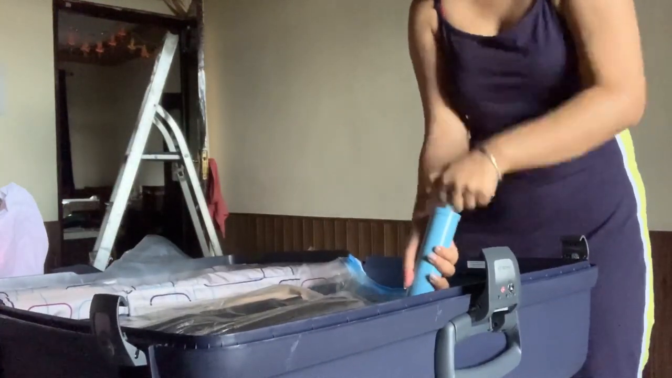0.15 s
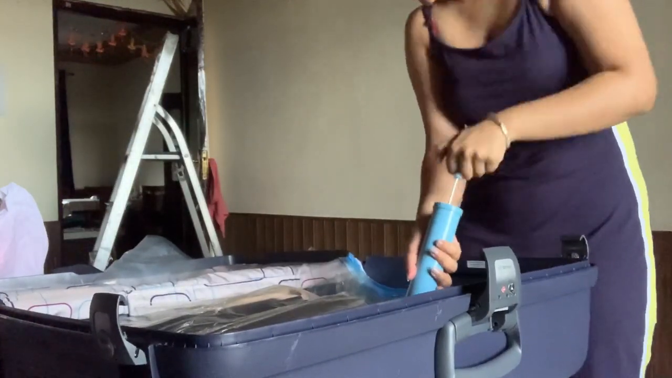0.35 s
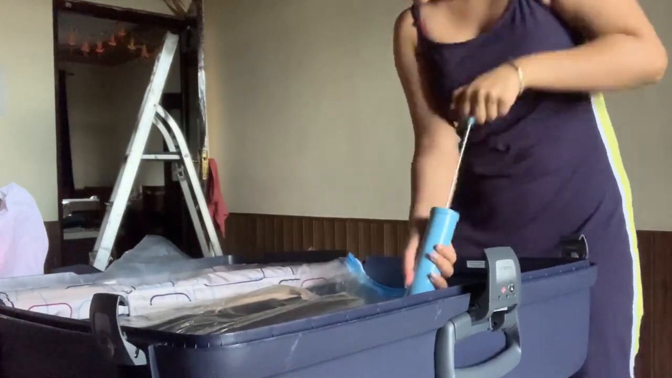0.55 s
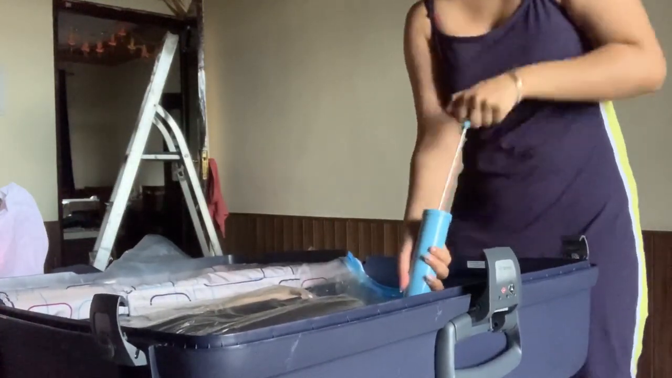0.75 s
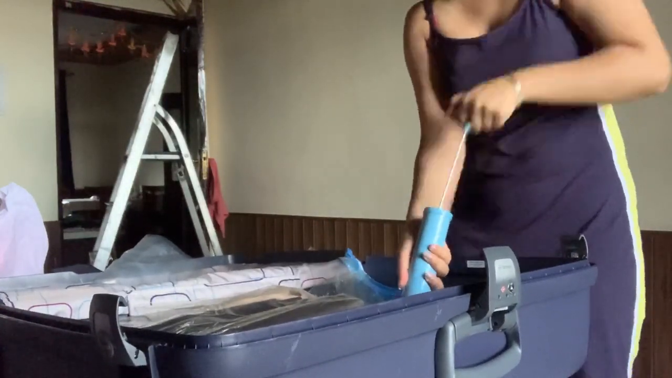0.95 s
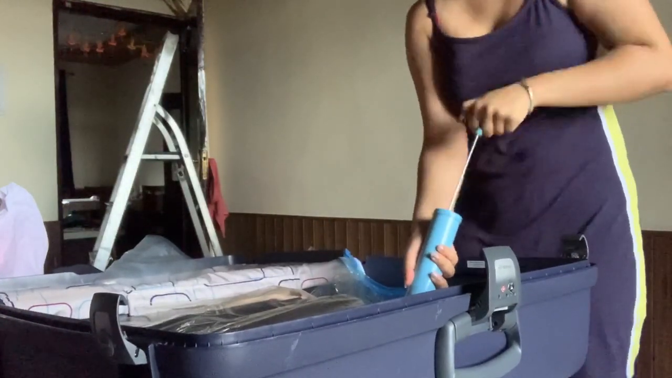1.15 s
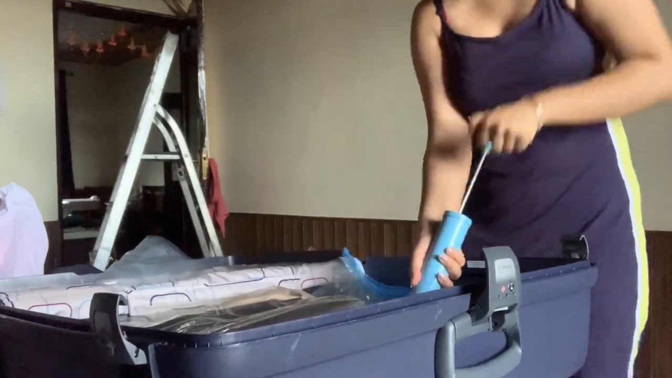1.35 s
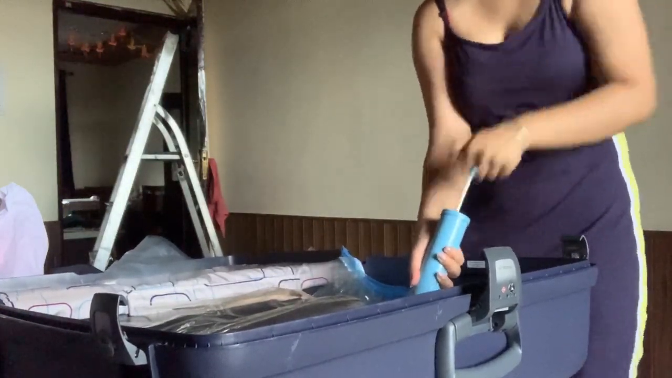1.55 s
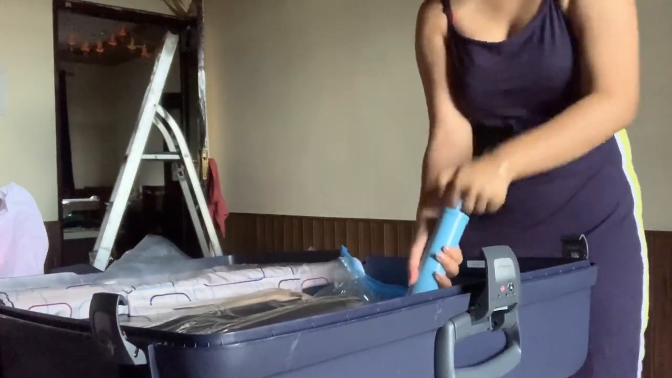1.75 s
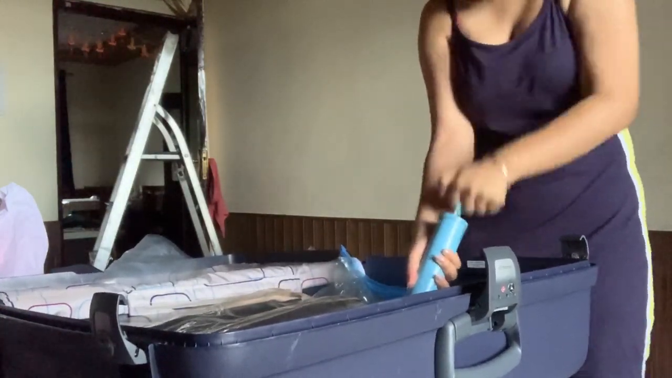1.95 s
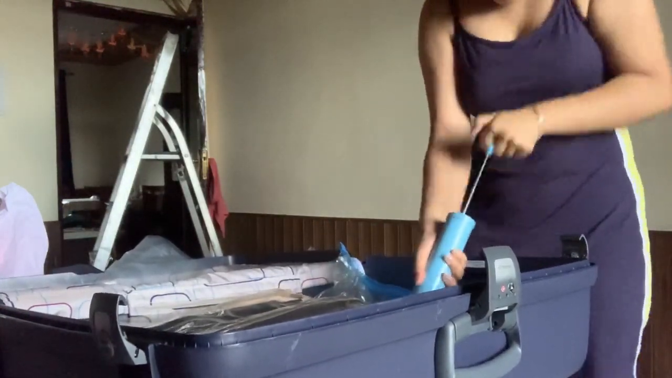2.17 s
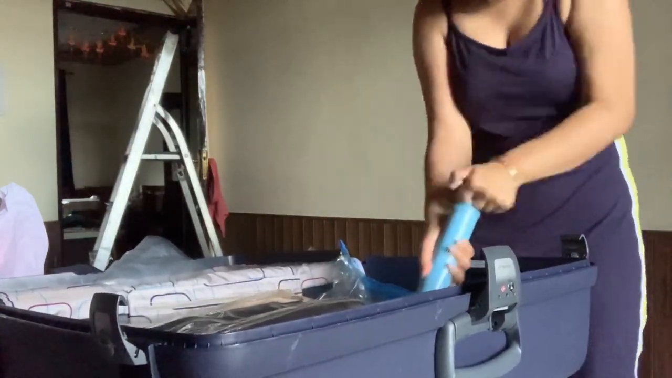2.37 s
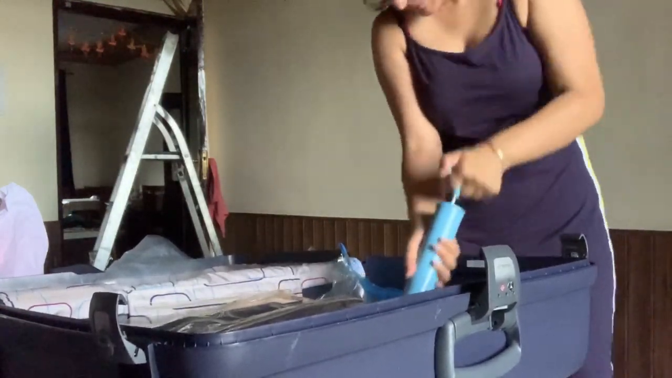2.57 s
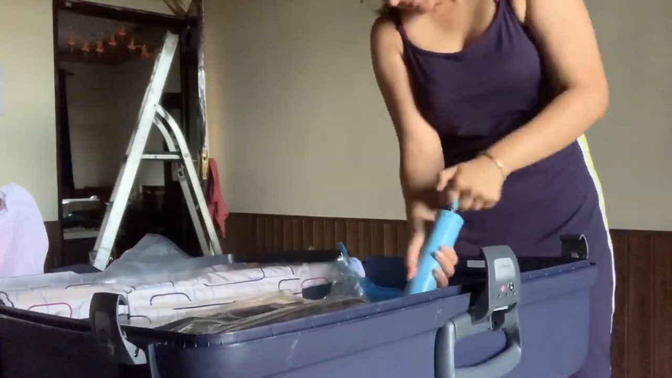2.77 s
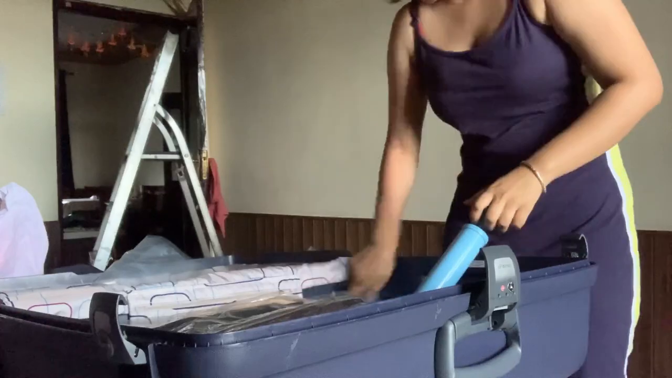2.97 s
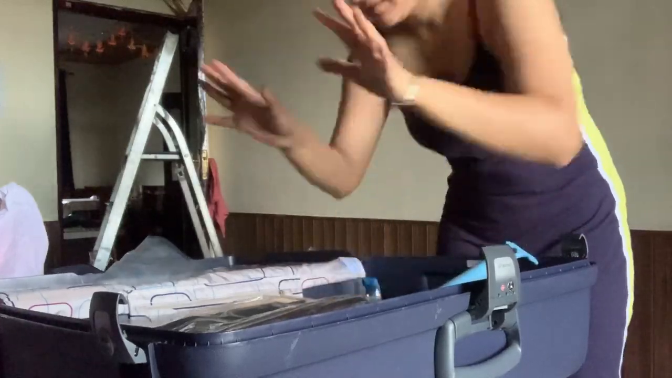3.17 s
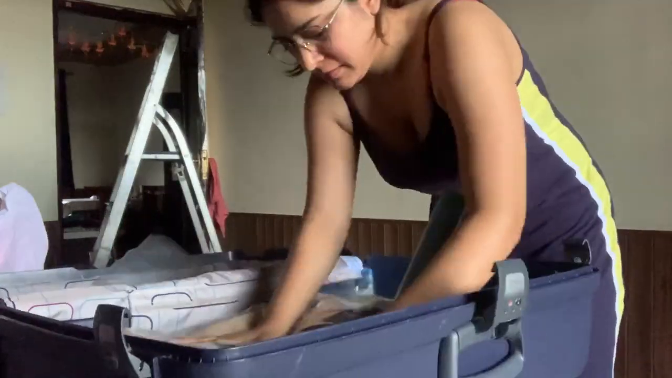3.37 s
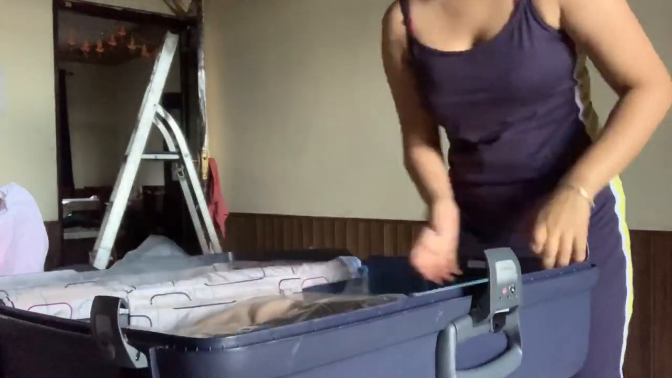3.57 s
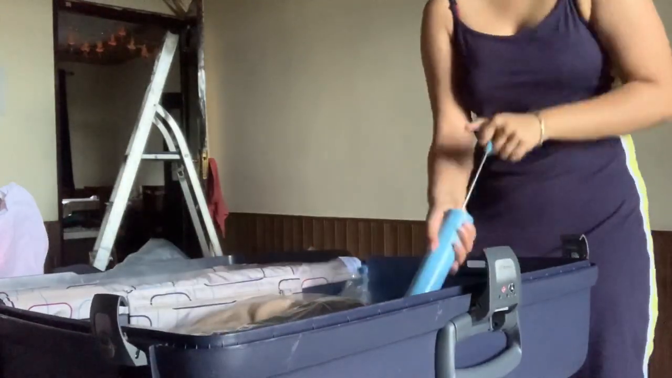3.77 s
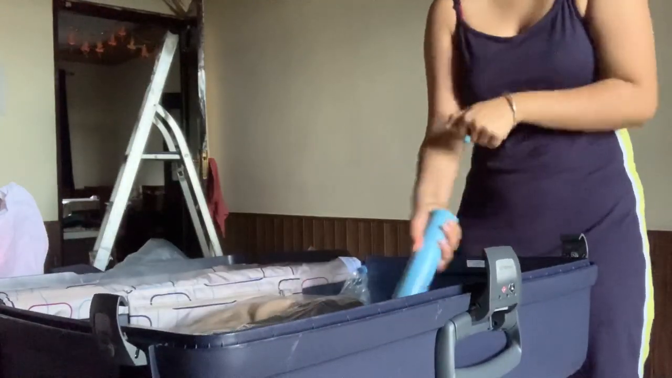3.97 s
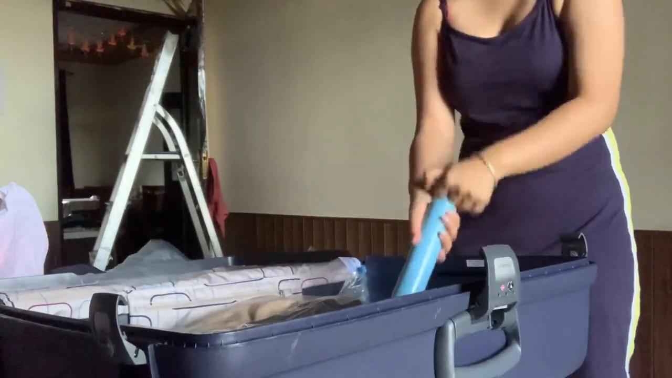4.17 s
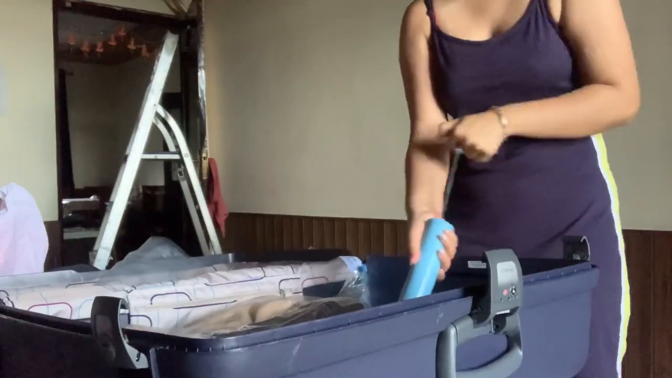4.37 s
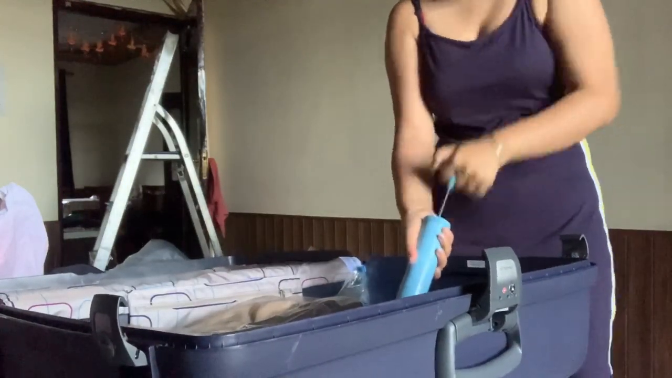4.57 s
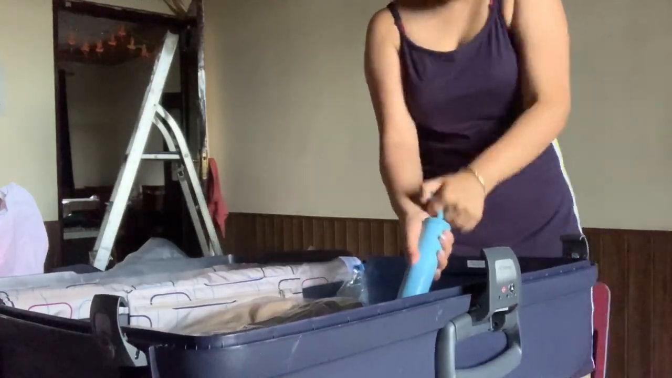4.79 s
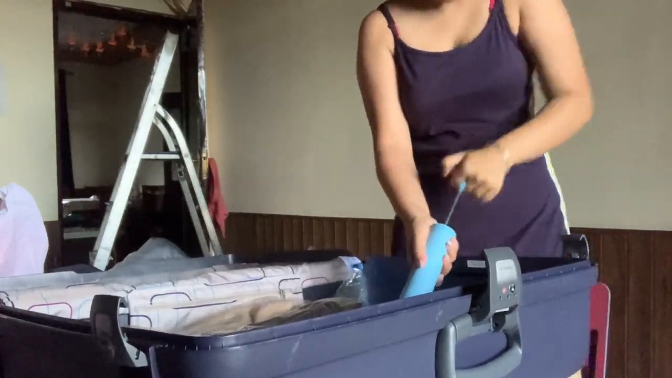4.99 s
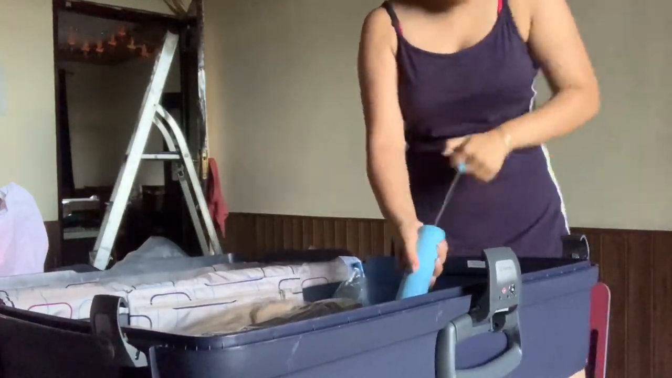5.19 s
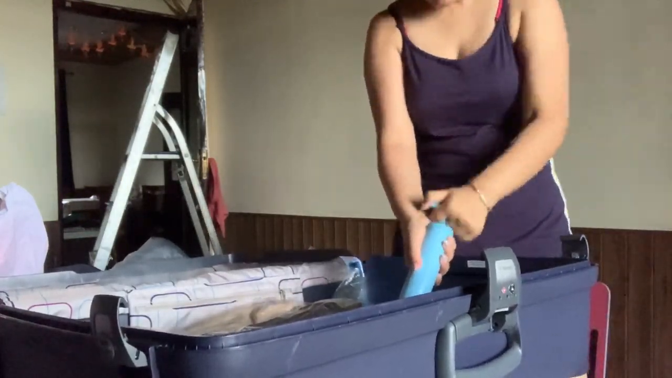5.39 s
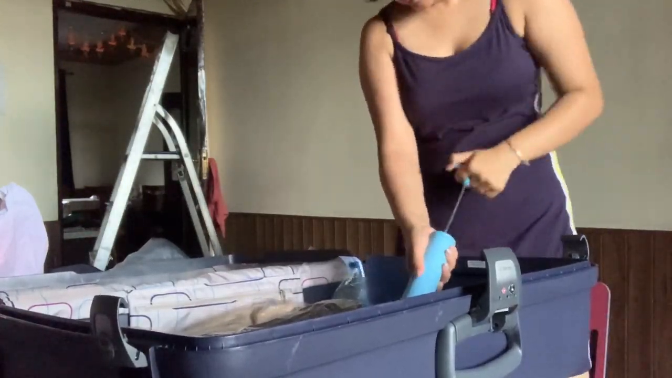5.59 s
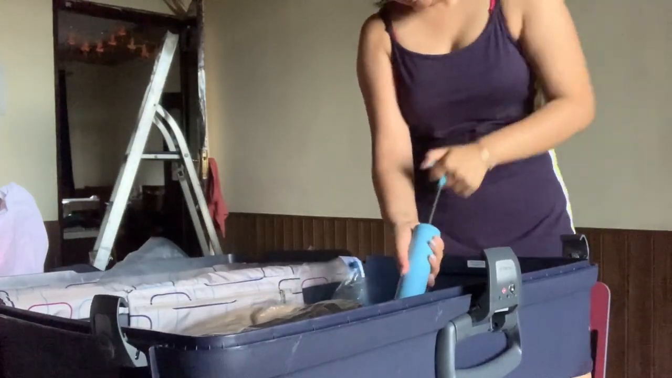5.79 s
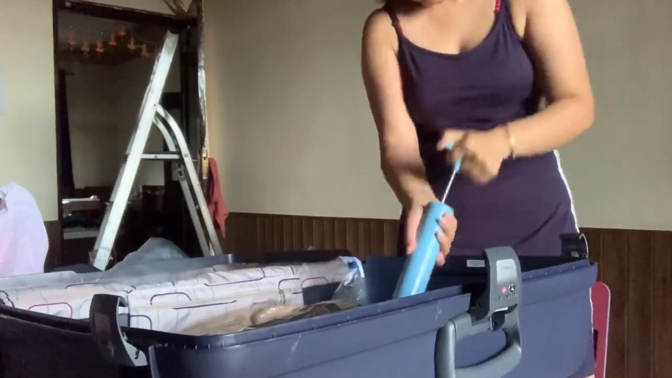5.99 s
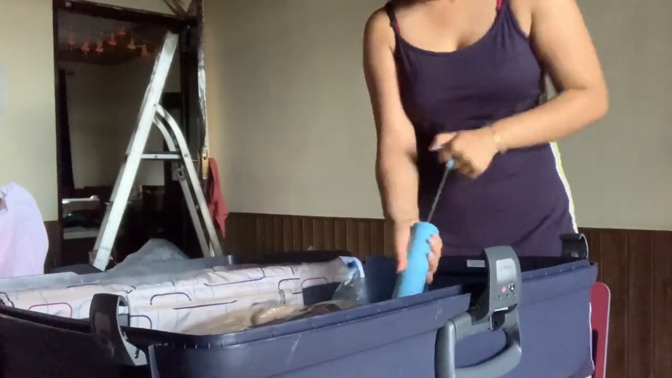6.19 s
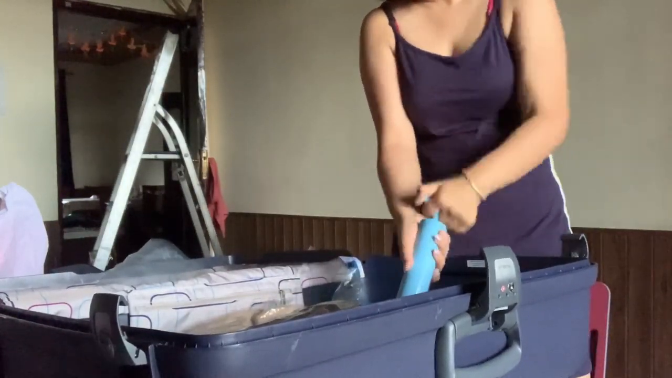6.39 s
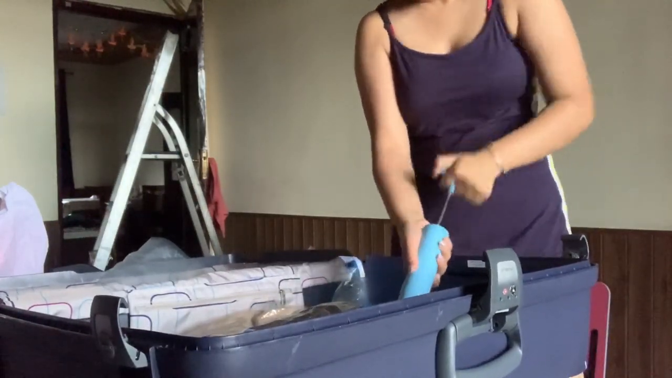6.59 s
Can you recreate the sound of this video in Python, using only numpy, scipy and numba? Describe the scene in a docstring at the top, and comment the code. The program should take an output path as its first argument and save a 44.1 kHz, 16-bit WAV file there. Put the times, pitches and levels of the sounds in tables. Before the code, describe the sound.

In a small furnished room, very close to the microphone, a plastic plunger pump starts at once: quick strokes with a short hesitation near 0.3 s, then a steady ten or so per second. Each is a breathy puff whose hollow airy tone glides downward, ending in a bright tick and small hollow knock, with a rod clack on the way back. From 1.3 to 1.7 s the ticks nearly vanish, then return sharp until 2.8 s. Pumping pauses; at 3.0 s the pump pops off with a knock and bag crinkle, and at 3.25 s it drops with a loud, boxy plastic thump. Rustles, creases snapping, soft bumps and scuffs follow, with another knock at 3.5 s. From 3.8 s pumping resumes at about eight strokes per second, thinner, with softer uneven stops and prominent clacks, quietest near 5 s, continuing to the end at about 6.6 s over faint thin hissing.

```python
"""Hand pump on a storage bag

A small plastic plunger pump works in quick strokes on a bag lying in an open suitcase, in a small room.
Noise for the air swells with the piston's speed and is coloured by the air column in the barrel.
Each stroke ends in a tick and a hollow knock, and the rod clacks as it turns back: short dying tones and noise.
Midway the pump comes off and drops into the suitcase, the bag rustles, and the pumping starts again."""
import sys
import numpy as np
from scipy import signal
from scipy.fft import rfft, irfft
from scipy.io import wavfile
from scipy.ndimage import uniform_filter1d, map_coordinates
from numba import njit

SR = 44100
rng = np.random.default_rng(int(sys.argv[2]) if len(sys.argv) > 2 else 0)


def materialize(psi):
    """Save the field psi as 16-bit PCM at rate SR to the path in sys.argv[1].

    A 1-D psi becomes a single channel; in a 2-D psi each row is a channel.
    """
    bounded = np.clip(np.atleast_2d(psi).T, -1, 1)
    quanta = np.round(bounded * 32767).astype(np.int16)
    wavfile.write(sys.argv[1], SR, quanta)


N = 292824
TIME = np.arange(N) / SR
DROP_S = 3.2485  # the pump drops into the suitcase

# Levels in the tables are relative where a function adds its own level.
# the piston meets its stop: t/s, tick level/dB, knock level/dB
STROKE_ENDS = [(0.0731, -25.0, -30.5), (0.1699, -16.0, -26.5), (0.2697, -20.0, -31.0),
               (0.4012, -23.0, -36.5), (0.526, -16.5, -27.5), (0.6315, -17.5, -30.0),
               (0.7322, -17.0, -28.5), (0.8333, -21.0, -31.5), (0.9358, -22.0, -29.0),
               (1.0311, -18.0, -31.5), (1.129, -16.5, -33.0), (1.223, -21.0, -32.5), (1.326, -52.0, -41.0),
               (1.4143, -52.0, -40.5), (1.5064, -48.5, -41.0), (1.601, -50.0, -40.0),
               (1.6917, -49.5, -41.0), (1.7828, -17.5, -30.0), (1.8776, -17.0, -32.5),
               (1.9694, -19.0, -34.5), (2.06, -25.0, -34.0), (2.1461, -32.0, -32.5), (2.2253, -22.5, -34.5),
               (2.3099, -16.0, -33.5), (2.3957, -21.0, -32.0), (2.4906, -34.0, -35.0),
               (2.5743, -21.0, -30.5), (2.673, -17.0, -36.0), (2.76, -18.0, -37.5), (3.8276, -43.0, -39),
               (3.9376, -40.5, -34), (4.0689, -25.5, -36.5), (4.194, -35.5, -35), (4.317, -45.5, -42),
               (4.438, -17.5, -39.0), (4.5662, -33.5, -33.5), (4.6884, -30.0, -34.0),
               (4.8138, -49.5, -42.5), (4.9348, -56.0, -48), (5.051, -53.5, -46), (5.171, -48.5, -45),
               (5.2877, -38.0, -32.5), (5.4143, -37.5, -36.5), (5.533, -31.5, -32.5),
               (5.6585, -48.0, -37.5), (5.7812, -39.5, -39.5), (5.8984, -30.5, -36.5),
               (6.0368, -24.5, -31.5), (6.1663, -30, -37.5), (6.2809, -25.0, -35.5), (6.406, -32.5, -36.0),
               (6.5247, -27.0, -36.0), (6.6389, -22.0, -48)]
# the rod turns back: t/s, level/dB
ROD_TURNS = [(0.1201, -26.0), (0.222, -38), (0.4696, -29.0), (0.5807, -28.0), (0.6815, -31.5),
             (0.78, -29.0), (0.8792, -29.0), (0.9867, -31.5), (1.0819, -26.0), (1.2712, -26.5),
             (1.362, -29.0), (1.4515, -30.0), (1.5444, -28.0), (1.64, -31.5), (1.7311, -30.0),
             (2.0163, -31.0), (3.881, -24), (3.9811, -21.5), (4.1196, -21.0), (4.247, -24.0),
             (4.3634, -28.0), (4.4991, -19.5), (4.6204, -20.0), (4.7418, -22.5), (4.8609, -27.0),
             (4.979, -28.5), (5.0923, -23.5), (5.215, -27.0), (5.3404, -23.5), (5.4663, -22.5),
             (5.5892, -26.0), (5.7098, -24.0), (5.8346, -27.5), (5.9585, -25.0), (6.1236, -37),
             (6.2226, -30.5), (6.3425, -34.5), (6.4617, -29.0), (6.5817, -31.0)]
# tones of barrel and suitcase: f/Hz, t60/s before extra damping, level/dB at a stroke's end, at a turn, at a blow
BODY_TONES = [(108, 0.06, -20, -22, -34), (156, 0.05, -21, -16, -28), (254, 0.047, -15.5, -16, -14),
              (323, 0.043, -8.5, -13.5, -5.5), (385, 0.048, 0.5, -4.5, -0.5), (448, 0.046, -5, -11, -6.5),
              (543.5, 0.085, -10, -15.5, -13), (673.2, 0.066, -3, -6, 0.5), (748.4, 0.077, -3, -3.5, -4.5),
              (909, 0.051, -14, -8, -5.5), (1003, 0.089, -12, -7.5, -7), (1173.6, 0.068, -5, -5, -6.5),
              (1330, 0.054, -11, -13.5, -12), (1613, 0.053, -8, -11, -16), (1941, 0.074, -16.5, -13, -27),
              (2900, 0.053, -19, -10, -14)]
# tones of hard plastic contact: f/Hz, t60/s before extra damping, level/dB at a stroke's end, at a turn
TICK_TONES = [(4140, 0.0032, -25, -11), (7150, 0.0054, -19, -20), (10530, 0.0036, -10, -9),
              (13130, 0.002, -9, 3.5), (14460, 0.0025, 0.5, 2.5)]
# quarter-wave resonances of the air column with the piston fully in: f/Hz, width/Hz, level/dB
AIR_COLUMN = [(1330, 350, 2), (3850, 310, 3.5), (6700, 450, 0), (9600, 500, 0), (12200, 650, -2)]
# spectrum of chattering loose plastic: f/Hz, level/dB
CHATTER_SPECTRUM = [(100, -40), (1000, 10), (2000, 7), (4000, 9), (6000, 3), (9000, 10.5), (10200, 5.5),
                    (11700, 14), (14000, -4), (15300, 3.5), (16500, -27)]
# spectrum of the plastic bag: f/Hz, level/dB
BAG_SPECTRUM = [(35, -70), (60, -46), (198, -19), (323, -11), (371, -10), (566, -5), (1140, -8), (1250, -7),
                (1860, -10.5), (2520, -8.5), (6900, -11), (16000, -19)]


def air():
    """Air and the rubbing seal hiss in uneven puffs that follow the piston's speed."""
    # spectrum of the air rush: f/Hz, level/dB
    rush_spectrum = [(40, -42), (100, -4), (190, 2), (400, 2.5), (600, 2), (1000, 7), (1600, -3),
                     (2900, 4.5), (6000, 0.5), (9000, 0), (12500, 0.5), (15300, 1), (16500, -36)]
    # once reseated, the pump hisses more thinly: f/Hz, gain/dB
    reseated_spectrum = [(170, 4), (300, -3.5), (600, -2), (1100, 0), (1900, -3), (3200, -1), (4600, -2.5),
                         (13000, 3)]
    # air squeezes past the seal on a pull: t/s, level/dB
    seal_puffs = [(.295, -42), (.452, -43), (.566, -37)]
    rush_db, column_db, rest_db = -1.3, -5, -32
    angle = stroke_angle()
    length = column_length(angle)
    flow = patchy(colour(noise(spread=.5), rush_spectrum), rough_db=4, rate=90, patch_hz=800)
    singing = undb(column_db) * column(angle, length)
    stick_slip = grain(rough_db=1.8, rate=170) * grain(rough_db=2.7, rate=800)
    barrel = undb(rush_db) * hollow(flow, length) * stick_slip + singing
    barrel = np.where(TIME < DROP_S, barrel, colour(barrel, reseated_spectrum))
    puffs = band(3180, width_hz=550, spread=.5) * swells(*np.transpose(seal_puffs), width=.006)
    hiss = barrel * piston_speed() + seep(angle)
    return hiss * undb(rest_db * (1 - working())) + puffs


def piston_speed():
    """Air flow: a push with slow creep around it, a faster rebound off a hard stop, a stall, then a jerk."""
    # how hard the hand pumps: t/s, air rush level/dB
    effort = [(0.07, -37.9), (0.75, -39.0), (1.3, -38.7), (1.7, -38.3), (1.9, -36.2), (2.3, -36.6),
              (2.76, -35.9), (3.83, -37.2), (4.1, -35), (4.31, -39), (4.44, -35.5), (4.6, -38.2),
              (4.93, -43.9), (5.25, -39.4), (5.7, -40.7), (5.95, -37.2), (6.6, -38.6)]
    end, tick, _ = np.transpose(STROKE_ENDS)
    turn = np.transpose(ROD_TURNS)[0]
    db = np.interp(end, *np.transpose(effort))
    softness = -17 - tick  # dB below a hard tick
    # the rush peaks just before the stop; the softer the stop, the earlier the piston has slowed
    lead_s, lead_s_per_db = .005, .0003
    fastest = end - lead_s - lead_s_per_db * softness
    push = swells(fastest, db + 3.2, width=.0135)
    creep = swells(fastest, db - 7, width=.029)
    rebound = np.where(end < DROP_S, -.5, -8) - .22 * softness
    pull = swells(end + .021, db + rebound, width=.016)
    turn_db = np.interp(turn, *np.transpose(effort))
    jerk = swells(turn + .015, turn_db - 5.5, width=.008)
    halfway = (end[1:] + end[:-1]) / 2
    # turns without a clack: no listed turn within 0.03 s of halfway
    silent = halfway[np.abs(halfway[:, None] - turn).min(1) > .03]
    stalled = swells(turn - .014, np.zeros(len(turn)), width=.005)
    stalled += swells(silent, np.zeros(len(silent)), width=.009)
    stall_db = -3.5
    return np.sqrt(push ** 2 + creep ** 2 + pull ** 2 + jerk ** 2) * undb(stall_db * stalled)


def working():
    """1 while the hand pumps, 0 while it rests and hardly any air moves, with short fades between."""
    # the hand rests: from t/s, to t/s
    pauses = [(.312, .388), (2.795, 3.79), (6.087, 6.112)]
    fade_s = .024
    moving = 1. - sum((TIME > start) & (TIME < stop) for start, stop in pauses)
    return np.clip(uniform_filter1d(moving, int(fade_s * SR)), 0, 1)


def stroke_angle():
    """The pump's cycle as an angle: one full turn per stroke, a whole turn at each stop."""
    end = np.transpose(STROKE_ENDS)[0]
    return 2 * np.pi * np.interp(TIME, end, np.arange(len(end)))


def column_length(angle):
    """Air column, near 1 at the stop: it grows fast in mid-push and levels off as the piston lands."""
    travel, landing, reseated_landing = .55, .44, .54
    uneven = grain(rough_db=1.3, rate=9)  # no two pushes land alike
    away = np.sin(angle / 2) / (uneven * np.where(TIME < DROP_S, landing, reseated_landing))
    return (1 - travel * (1 - np.exp(-away ** 2))) * grain(rough_db=.35, rate=130)


def column(angle, length):
    """The air column lengthens in each push, so its breathy resonances glide down into the stop."""
    # what the pump's outlet lets through: f/Hz, gain/dB
    outlet_gain = [(1400, -4), (1850, -3), (2450, 1), (3200, -5), (4000, 0), (5400, 1), (6500, -7),
                   (8500, -6), (10500, 0), (15000, -2)]
    pull_share, whistle_db = .25, -9
    pushing = pull_share + (1 - pull_share) * np.clip(.5 - 3 * np.sin(angle), 0, 1)
    out = 0
    for hz, width_hz, tone_db in AIR_COLUMN:
        centre = np.minimum(hz / length, .44 * SR)  # stay below half the sample rate
        breathy = unit(np.array([resonate(side, centre, float(width_hz)) for side in noise(spread=.5)]))
        # the whistle's pitch jumps every 32 samples
        waver = width_hz * np.repeat(rng.standard_normal(N // 32 + 1), 32)[:N] / 2
        whistle = np.sqrt(2) * np.sin(2 * np.pi * np.cumsum(centre + waver) / SR)
        tone = breathy + undb(whistle_db) * whistle
        out = out + undb(tone_db) * tone * grain(rough_db=4, rate=130)
    return unit(colour(out * pushing, outlet_gain))


def hollow(x, length):
    """The piston reflects the rush, which carves moving valleys between the column's resonances."""
    depth = .35
    late = (TIME - length / (2 * AIR_COLUMN[0][0])) * SR  # sample position of the echo
    echo = np.array([map_coordinates(side, [late], order=1) for side in high_pass(x, hz=900)])
    return unit(x - depth * echo)


def seep(angle):
    """Air seeping through the bag's valve hisses and whistles thinly, flaring with suction in each push."""
    # level of the hiss: t/s, level/dB
    hiss_level = [(0, -40), (.3, -46), (.5, -44), (1.35, -47), (1.8, -50), (2.3, -46), (2.76, -44),
                  (4.0, -42), (4.6, -45), (6.64, -44.5)]
    # spectrum of the hiss: f/Hz, level/dB
    hiss_spectrum = [(40, -44), (150, 3), (400, -5), (1000, -2), (1500, -6), (3000, -6), (6500, -9),
                     (8300, -12), (12000, -12), (16000, -30)]
    # level of the thin whistle: t/s, level/dB
    whistle_level = [(0, -38), (.3, -44), (.5, -44), (.8, -42), (1.35, -44), (1.8, -48), (2.3, -46),
                     (2.76, -48), (3.8, -48), (4.6, -48), (5.3, -51), (6.6, -52)]
    hiss_db, whistle_db = -6, -3
    suction, reseated_suction, lead_rad, flare = .35, .25, .6, .45
    hiss = unit(colour(noise(spread=.7), hiss_spectrum)) * grain(rough_db=4, rate=90)
    pulse = 1 + np.where(TIME < DROP_S, suction, reseated_suction) * np.cos(angle + lead_rad)
    flutter = grain(rough_db=5, rate=70)
    whistle = band(7720, width_hz=750, spread=.6) * flutter * (1 + flare * np.cos(angle))
    hiss_gain = undb(np.interp(TIME, *np.transpose(hiss_level)) + hiss_db)
    whistle_gain = undb(np.interp(TIME, *np.transpose(whistle_level)) + whistle_db)
    return hiss * pulse * hiss_gain + whistle * whistle_gain


def stops():
    """The piston meets its stop: a hard tick, a chatter of loose plastic, a hollow thump, a knock and a thud."""
    # hollow thump of the barrel: f/Hz, t60/s, level/dB at first, level/dB once reseated
    thump_tones = [(385, .04, -1.5, -5), (560, .02, -4, -4), (730, .034, -2, 0), (1000, .022, -8, -4),
                   (1250, .022, -3, -6)]
    s, tick, knock = np.transpose(STROKE_ENDS)
    # after the drop the pump sits more lightly: a flatter tick, a softer knock with less bass
    first, later = s < DROP_S, s >= DROP_S
    flatten = .63
    hz, t60, tones, _ = np.transpose(TICK_TONES)
    snap = strike(s[first], tick[first] + 14.5, hz, t60, tones,
                  scatter_db=1, detune=.018, push=.00006)
    snap += strike(s[later], tick[later] + 15, hz, t60 / 2, flatten * tones,
                   scatter_db=4, detune=.033, push=.00006)
    hz, t60, deep, light, _ = np.transpose(BODY_TONES)
    # weaker by 9 dB per octave above 850 Hz and 3 dB per octave below 300 Hz
    soft = light - 9 * np.log2(np.maximum(hz / 850, 1)) - 3 * np.log2(np.maximum(300 / hz, 1))
    grip = dict(scatter_db=1.5, detune=.035)
    body = strike(s[first], knock[first] + 5.5, hz, .8 * t60, deep, loose_phase=1, push=.0015, **grip)
    body += strike(s[later], knock[later] + 5, hz, .65 * t60, soft, loose_phase=1, push=.0032, **grip)
    # the knock takes a moment to spread through the suitcase
    thump_lag_s, thud_lag_s = .001, .002
    hz, t60, deep, light = np.transpose(thump_tones)
    body += strike(s[first] + thump_lag_s, knock[first] + 7.5, hz, t60, deep, push=.002, **grip)
    body += strike(s[later] + thump_lag_s, knock[later] + 8, hz, t60, light, push=.004, **grip)
    loose = fades(s, tick + np.where(first, -11, -6), decay=.0085)
    chatter = unit(colour(noise(spread=1.0), CHATTER_SPECTRUM)) * loose
    thud_level = fades(s + thud_lag_s, knock + np.where(first, -4.5, -6), decay=.012)
    thud = band(840, width_hz=750, spread=.35) * thud_level
    return snap + body + thud + chatter


def turns():
    """The rod knocks in its guide as the hand reverses: a clack, lower once reseated; hard turns ring high."""
    s, db = np.transpose(ROD_TURNS)
    first = s < DROP_S
    hz, t60, _, tones = np.transpose(TICK_TONES)
    snap = strike(s, db + 11.5, hz, t60, tones, scatter_db=2.5, detune=.0088, push=.0001)
    hz, t60, _, tones, _ = np.transpose(BODY_TONES)
    # knock and chatter vary less than the tick from turn to turn, the ring varies more
    knock_db = .4 * db + np.where(first, -15.5, -20)
    body = strike(s, knock_db, hz, .85 * t60, tones, scatter_db=3, detune=.035, push=.0018)
    chatter_db = .3 * db + np.where(first, -19, -19.5)
    chatter = unit(colour(noise(spread=.77), CHATTER_SPECTRUM)) * fades(s, chatter_db, decay=.009)
    lag_s = .002
    clack = band(1500, width_hz=800, spread=.5) * fades(s[first] + lag_s, db[first] - 6, decay=.009)
    clack += band(950, width_hz=800, spread=.5) * fades(s[~first] + lag_s, db[~first] - 14, decay=.011)
    rod_hz, rod_width_hz = 13060.0, 1200.0
    rod = np.array([resonate(side, np.full(N, rod_hz), rod_width_hz) for side in noise(spread=.62)])
    ring = unit(rod) * fades(s, 1.6 * db + 9, decay=.011)
    return snap + body + chatter + clack + ring


def handling():
    """The pump pops off; it and the hands hit the suitcase, the bag crinkles, the clothes thud and scuff."""
    # blows on the suitcase: t/s, knock level/dB, crack level/dB
    suitcase_blows = [(3.007, -19.5, -28), (3.2447, -19, -18), (3.2485, -7.5, -9), (3.389, -27, -33),
                      (3.399, -28, -36), (3.426, -29, -39), (3.4954, -19, -34), (3.641, -32, -47),
                      (3.727, -35, -47)]
    # spectrum of a blow's crack: f/Hz, level/dB
    crack_spectrum = [(25, -22), (70, -9), (150, 1), (400, 4), (600, 14), (1100, 10), (2000, 10.5),
                      (4500, 8), (8000, 5.5), (15500, 1.5), (16500, -29)]
    # the bag's rustle as the pump comes off and the hands press on it: t/s, level/dB
    rustle_level = [(2.84, -60), (2.87, -47), (2.895, -62), (2.92, -58), (2.963, -74), (2.977, -40),
                    (2.998, -26), (3.025, -39), (3.06, -36), (3.11, -44), (3.14, -58), (3.16, -51),
                    (3.2, -74), (3.24, -70), (3.27, -34), (3.36, -41), (3.392, -31), (3.415, -43),
                    (3.435, -36), (3.455, -41), (3.477, -33), (3.51, -39), (3.55, -49), (3.63, -70),
                    (3.68, -43), (3.71, -47), (3.745, -40), (3.785, -50), (3.82, -42), (3.87, -42),
                    (3.93, -38), (4.0, -42), (4.06, -41), (4.13, -46), (4.2, -45), (4.3, -56)]
    # soft bumps on the packed clothes: t/s, level/dB
    clothes_bumps = [(2.83, -47), (3.028, -37), (3.276, -44), (3.602, -47), (3.626, -44)]
    # hands and pump scuff over the packed clothes: t/s, level/dB
    clothes_scuffs = [(2.872, -54), (2.92, -56), (3.026, -38), (3.112, -38), (3.282, -38), (3.437, -41),
                      (3.478, -41), (3.501, -30), (3.52, -42), (3.538, -46), (3.59, -47), (3.612, -51),
                      (3.66, -48), (3.745, -48)]
    s, knock, crack = np.transpose(suitcase_blows)
    hz, t60, _, _, tones = np.transpose(BODY_TONES)
    body = strike(s, knock, hz, t60, tones, scatter_db=1.0, detune=.018, push=.002, loose_phase=.1)
    slap = unit(colour(noise(spread=.72), crack_spectrum)) * fades(s, crack, decay=.0125)
    crinkle = patchy(colour(noise(spread=.6), BAG_SPECTRUM), rough_db=5.5, rate=140, patch_hz=900)
    creases = grain(rough_db=2.5, rate=200) * grain(rough_db=3, rate=1200)
    # silent outside the table's times
    rustle = undb(np.interp(TIME, *np.transpose(rustle_level), left=-np.inf, right=-np.inf))
    crinkle_db = -1.5
    bag = undb(crinkle_db) * crinkle * creases * rustle + crackle(rustle)
    bump_hz = 197.7 * grain(rough_db=2, rate=300)  # unsteady pitch
    bump = np.sqrt(2) * np.sin(2 * np.pi * np.cumsum(bump_hz) / SR)
    thud = bump * swells(*np.transpose(clothes_bumps), width=.008)
    scuff = band(620, width_hz=650, spread=.4) * swells(*np.transpose(clothes_scuffs), width=.007)
    pop_s, pop_db = 2.9965, -24  # the pump pops off the valve
    pop = band(3400, width_hz=2200, spread=.6) * fades([pop_s], [pop_db], decay=.008)
    return high_pass(body + slap + bag + thud + scuff + pop, hz=70)


def crackle(rustle):
    """Creases of the bag snap: a few loud ones, and many tiny ones that follow the rustle's level."""
    # single creases snap: t/s, level/dB
    crease_snaps = [(2.853, -42), (2.866, -39), (2.914, -43), (2.9993, -14), (3.058, -27), (3.156, -40),
                    (3.403, -25), (3.4735, -23), (3.545, -35), (3.686, -34), (3.7275, -27), (3.881, -21),
                    (3.943, -23), (4.0692, -16)]
    tiny_db, snap_db = -7, -9
    when, size = rng.random((1000, 2)).T
    tiny = unit(fades(when * TIME[-1], 14 * size, decay=.0005))  # sizes spread over 14 dB
    snaps = undb(snap_db) * fades(*np.transpose(crease_snaps), decay=.0011)
    return unit(colour(noise(spread=.7), BAG_SPECTRUM)) * (undb(tiny_db) * tiny * rustle + snaps)


def shell():
    """The suitcase wall flexes as the pump drops, right beside the microphone, so this thump has no echo."""
    # tones of the flexing wall: f/Hz, t60/s, level/dB
    wall_tones = [(60, 0.041, -28), (95, .04, -20), (160, .05, -21), (255, .045, -13), (320, .04, -2),
                  (382, 0.046, 1.5), (1060, .03, -7)]
    return strike([DROP_S], [-2], *np.transpose(wall_tones),
                  scatter_db=.5, detune=.005, push=.0014, loose_phase=.03)


def glance(x):
    """Treble glances off the suitcase's sides and arrives with other delays at each microphone port."""
    # reflections: left delay t/s, right delay t/s, level/dB
    side_echoes = [(.00021, 0.000095, -16.5), (.0013, 0.0016, -13), (.0031, 0.0027, -6.5),
                   (.0046, 0.0048, -8.5)]
    treble, out = high_pass(x, hz=1800), x
    for *delays, db in side_echoes:
        echo = [np.pad(side, (int(d * SR), 0))[:N] for side, d in zip(treble, delays)]
        out = out + undb(db) * np.array(echo)
    return out


def room(x):
    """Diffuse echoes of a furnished room, different at each port; the treble dies first."""
    wet_db, gap_s = -10, .0064
    low_t60, high_t60, split_hz = .32, .28, 3000  # seconds to fall by 60 dB, below and above the split
    t = TIME[:SR // 2]
    echoes = high_pass(rng.standard_normal((2, len(t))), hz=126)
    low = signal.sosfilt(signal.butter(2, split_hz, fs=SR, output="sos"), echoes)
    low_tail = low * np.exp(-np.log(1000) * t / low_t60)
    high_tail = (echoes - low) * np.exp(-np.log(1000) * t / high_t60)
    tail = (low_tail + high_tail) * (t > gap_s)
    tail /= np.sqrt((tail ** 2).sum(1, keepdims=True))
    wet = np.array([signal.fftconvolve(side, echo)[:N] for side, echo in zip(x, tail)])
    return x + undb(wet_db) * wet


def strike(times, db, hz, t60, mode_db, scatter_db, detune, push, loose_phase=1 / (2 * np.pi)):
    """Blows ring a set of dying tones, each blow a little differently; contact builds up over push seconds."""
    out, t = np.zeros(N), TIME[:SR // 6]
    chance = rng.standard_normal((len(times), 3, len(hz)))
    for start, peak_db, (size, shift, place) in zip(times, db, chance):
        # loose_phase: scatter of the starting phases, in turns
        phase = 2 * np.pi * (hz * (1 + detune * shift))[:, None] * t
        phase += 2 * np.pi * place[:, None] * loose_phase
        level = undb(mode_db + scatter_db * size)[:, None]
        decay = np.exp(-np.log(1000) * t / t60[:, None])
        ring = (level * np.sin(phase) * decay).sum(0)
        ring *= 1 - np.exp(-t / push)
        add(out, start, undb(peak_db) * ring / np.abs(ring).max())
    return out


def fades(times, db, decay):
    """Levels that jump up and die away, to about a third every decay seconds."""
    out = np.zeros(N)
    for t, d in zip(times, db):
        add(out, t, undb(d) * np.exp(-TIME[:SR // 4] / decay))
    return out


def swells(times, db, width):
    """Bell-shaped rises and falls of level, added as power; width in seconds."""
    power, reach = np.zeros(N), SR // 6
    for t, d in zip(times, db):
        near = slice(max(int(t * SR) - reach, 0), int(t * SR) + reach)
        power[near] += undb(2 * d) * np.exp(-.5 * ((TIME[near] - t) / width) ** 2)
    return np.sqrt(power)


def grain(rough_db, rate):
    """A gain that wanders at random, heading for a new value rate times a second."""
    knots = rng.standard_normal(N // 4)
    return unit(undb(rough_db * np.interp(TIME * rate, np.arange(len(knots)), knots)))


def patchy(x, rough_db, rate, patch_hz):
    """Each stretch of the spectrum, patch_hz wide, flares and fades on its own, rate times a second."""
    f, t, spectrum = signal.stft(x, SR, nperseg=256)
    chance = rng.standard_normal((128, 2048))
    grid = np.meshgrid(f / patch_hz, t * rate, indexing="ij")
    db = rough_db * map_coordinates(chance, grid, order=1, mode="mirror")
    return unit(signal.istft(spectrum * undb(db), SR)[1][..., :N])


def noise(spread):
    """Stereo white noise; spread is how strong the left-right difference is beside the common part."""
    mid, side = rng.standard_normal((2, N))
    return unit(mid + spread * side * np.array([[1], [-1]]))


def band(hz, width_hz, spread):
    """Stereo noise through the same resonance twice, for steep slopes."""
    centre, width = np.full(N, float(hz)), float(width_hz)
    return unit(np.array([resonate(resonate(side, centre, width), centre, width) for side in noise(spread)]))


@njit
def resonate(x, hz, width):
    """A resonance with a moving centre: a band-pass filter that keeps two running states."""
    y, band_state, low_state = np.empty(len(x)), 0., 0.
    for i in range(len(x)):
        g, damping = np.tan(np.pi * hz[i] / SR), width / hz[i]
        v = (band_state + g * (x[i] - low_state)) / (1 + g * (g + damping))
        band_state = 2 * v - band_state
        low_state += 2 * g * v
        y[i] = damping * v
    return y


def colour(x, points):
    """Filter by a smooth curve of f/Hz, gain/dB points."""
    hz, db = np.transpose(points)
    f = np.fft.rfftfreq(N, 1 / SR)
    return irfft(rfft(x) * undb(np.interp(np.log(f + 1), np.log(hz), db)), N)


def high_pass(x, hz):
    """Weaken what lies below hz."""
    return signal.sosfilt(signal.butter(2, hz, "high", fs=SR, output="sos"), x)


def add(track, start, sound):
    """Mix a sound in at a time in seconds."""
    i = int(np.clip(start * SR, 0, N - 1))
    track[i:i + len(sound)] += sound[:N - i]


def unit(x):
    """Scale to an average (rms) strength of 1."""
    return x / np.sqrt(np.mean(x ** 2))


def undb(db):
    """Decibels to gain."""
    return 10 ** (np.asarray(db) / 20)


def scene():
    """Pump and bag in the room; the small pump gives little deep bass, and the right port gets more bass."""
    # balance of the two microphone ports: f/Hz, left minus right level/dB
    port_balance = [(60, -4), (200, -4.5), (380, -10), (700, -7), (1300, -6), (2400, -0.5), (4400, 0.1),
                    (15000, 1)]
    pump = high_pass(air() + stops() + turns(), hz=104)
    left, right = room(glance(pump + handling())) + shell()
    left = colour(left, [(hz, db / 2) for hz, db in port_balance])
    right = colour(right, [(hz, -db / 2) for hz, db in port_balance])
    return np.array([left, right])


def record(dry):
    """The microphone clips the hardest peaks and cuts steeply above 16 kHz."""
    return signal.sosfilt(signal.ellip(8, .2, 70, 16000, fs=SR, output="sos"), np.clip(dry, -1, 1))


dry = scene()
out = record(dry)
materialize(out)
```